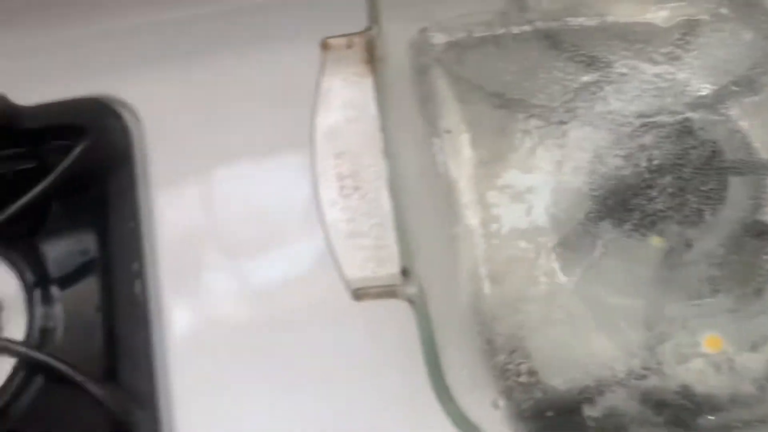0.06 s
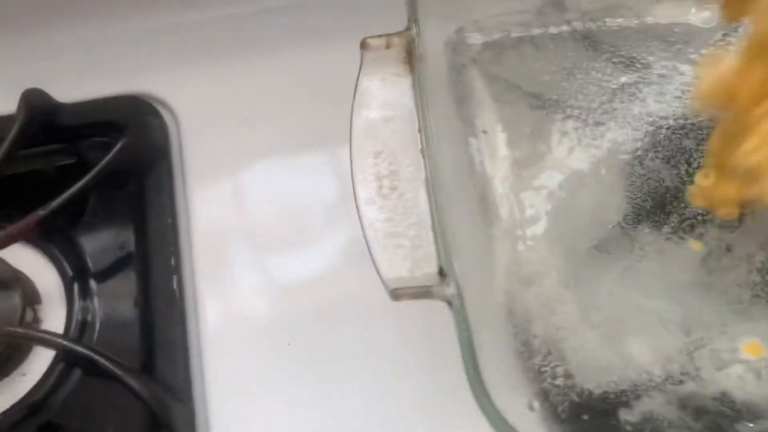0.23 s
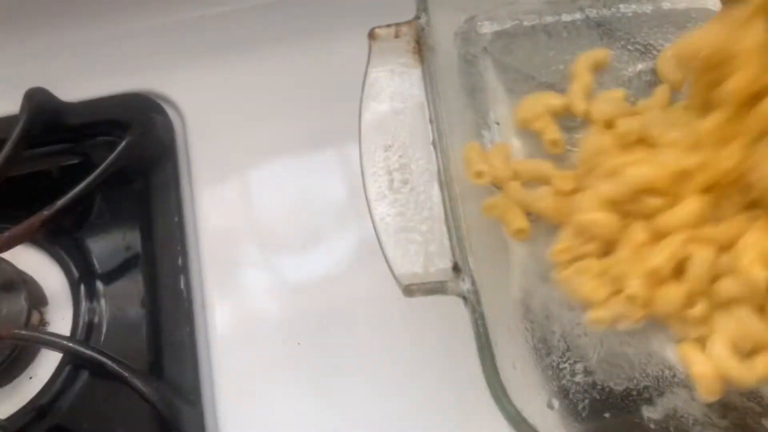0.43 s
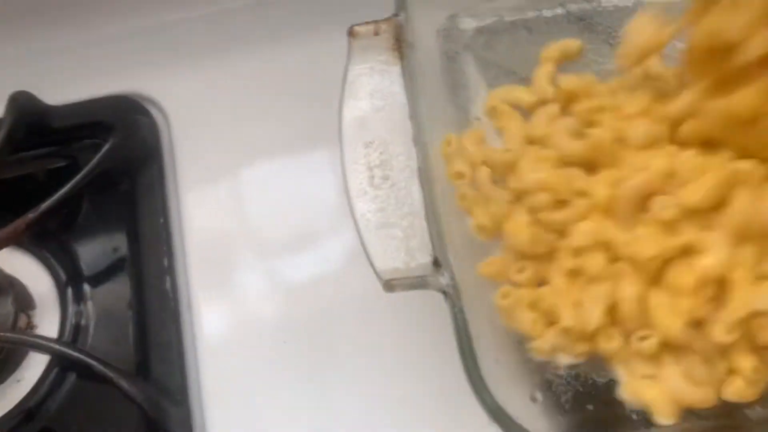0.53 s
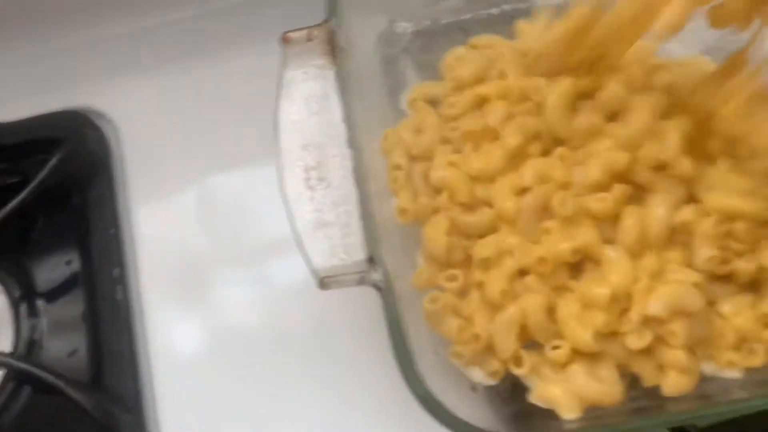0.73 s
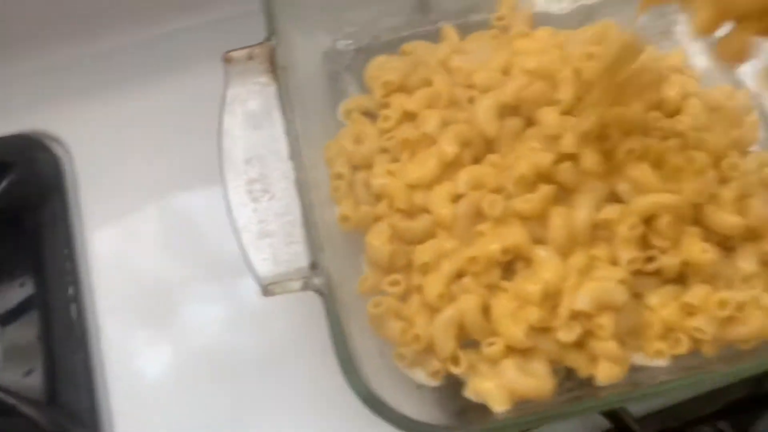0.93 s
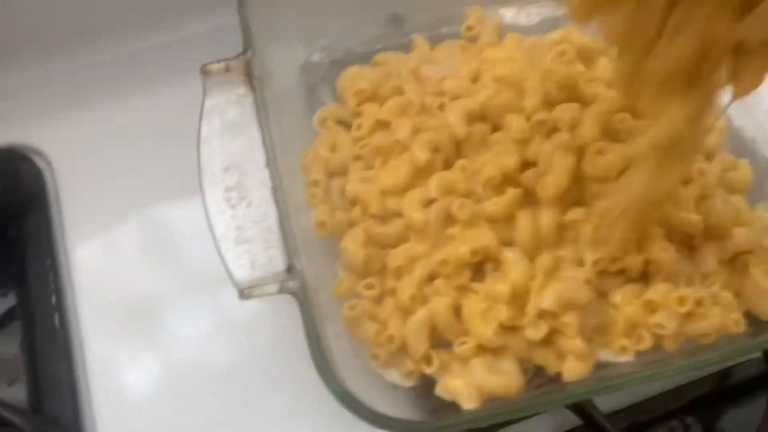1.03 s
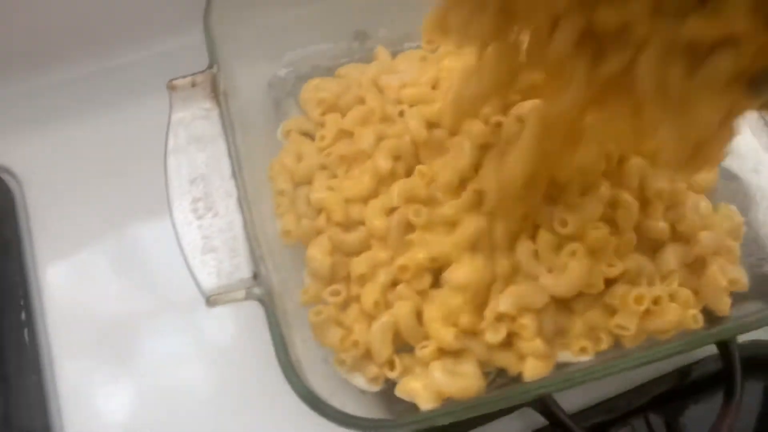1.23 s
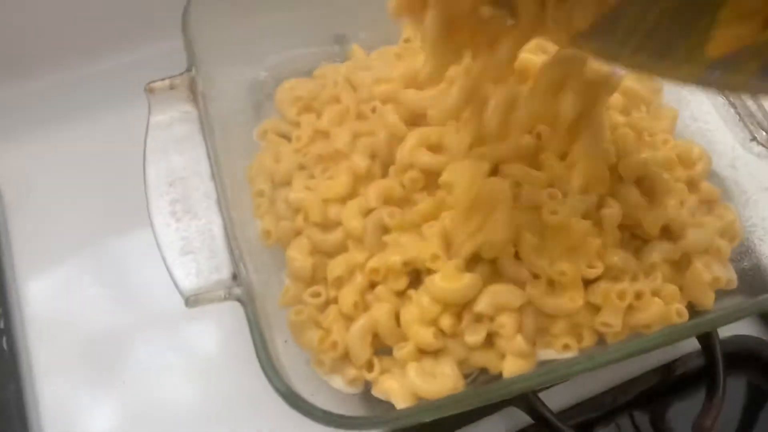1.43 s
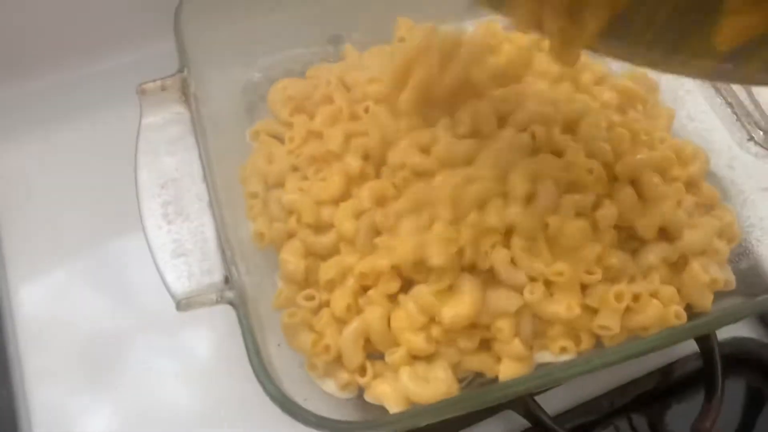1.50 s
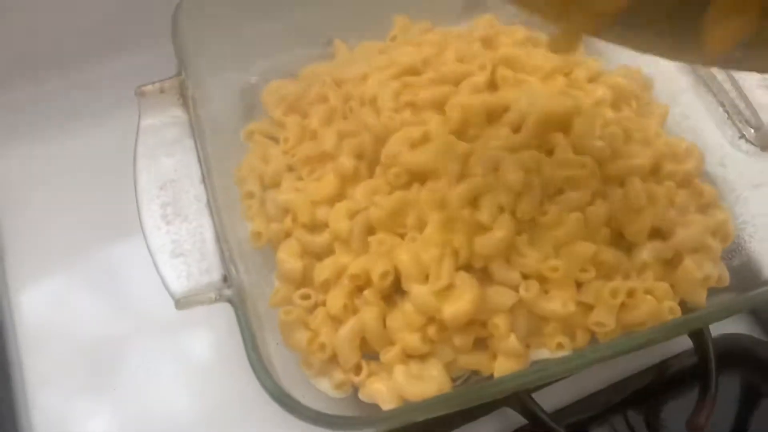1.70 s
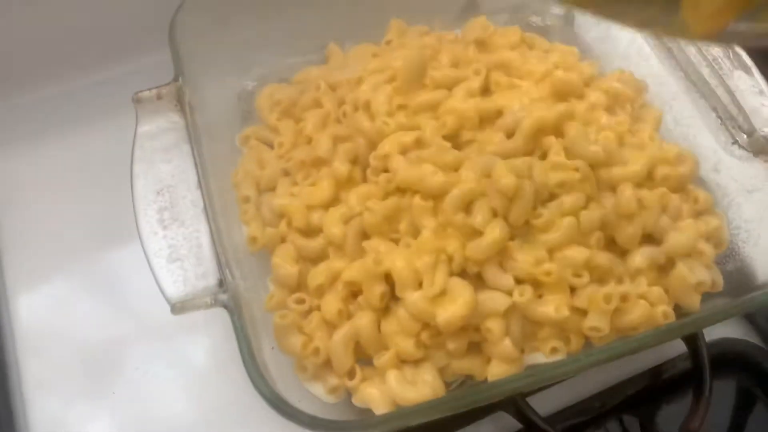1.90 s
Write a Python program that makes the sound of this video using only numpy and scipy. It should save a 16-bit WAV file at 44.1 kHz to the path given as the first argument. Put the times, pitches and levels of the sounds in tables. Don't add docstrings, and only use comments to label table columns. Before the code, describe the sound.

Cooked pasta is dumped into a glass dish. Faint wet ticks and a scrape lead to one loud, dull knock and splat at 0.23 seconds, its hollow ring quickly deadened by about 0.4. Soft lumps thud around 0.6 to 0.8, then sparse sticky clicks cluster near 1.2 and 1.45, with a last tick at 1.92. Close stereo, small kitchen, faint low rumble and hiss.

```python
import sys
import numpy as np
from scipy import signal
from scipy.fft import rfft, irfft, next_fast_len
from scipy.io import wavfile
from scipy.ndimage import map_coordinates

SR = 44100
rng = np.random.default_rng(int(sys.argv[2]) if len(sys.argv) > 2 else 0)


def transcribe(signal):
    frames = np.atleast_2d(signal).T
    limited = np.clip(frames, -1, 1)
    pcm = np.round(limited * 32767).astype(np.int16)
    wavfile.write(sys.argv[1], SR, pcm)


def amplitude_ratio(level_db):
    exponent = np.asarray(level_db, float) / 20
    return 10 ** exponent


N = 85995
KNOCK_S = 0.2335

# frequency in Hz, phase in radians.
PORT_LEAD = [(0, 0), (1050, 2.6), (1500, 1.5), (2000, 2), (2700, 1.2), (4200, 1), (5000, 3.1), (6300, 1.2),
             (7400, 3.14), (14500, 12.8)]


def unit(x):
    return x / np.sqrt(np.mean(x ** 2) + 1e-20)


def along(points, hz):
    f, v = np.transpose(points)
    return np.interp(np.log(hz + 1), np.log(f + 1), v)


def curve(rows):
    return np.interp(np.arange(N) / SR, *np.transpose(rows))


def wobble(rate):
    knots = rng.standard_normal(300)
    position = np.arange(0, N + 64, 64) * rate / SR
    return map_coordinates(knots, position[None]).repeat(64)[:N]


def filtered(x, response):
    m = next_fast_len(N + SR // 2)
    return irfft(rfft(x, m) * response(np.fft.rfftfreq(m, 1 / SR)), m)[..., :N]


def noise(spectrum, size=N):
    colour = filtered(rng.standard_normal(N), lambda hz: amplitude_ratio(along(spectrum, hz)))
    return unit(colour)[:size]


def add(track, s, sound):
    part = track[round(s * SR):][:len(sound)]
    part += sound[:len(part)]


def ping(t, hz, cycles):
    return np.sin(2 * np.pi * hz * t) * amplitude_ratio(-60 * t * hz / (3 * cycles))


def rumble():
    # time in seconds, level in dB.
    rumble_level = [
        (0, -56.5),
        (.12, -63.5),
        (.2, -58.5),
        (.3, -33.5),
        (.6, -50),
        (.9, -55),
        (1.3, -54),
        (1.55, -55.5),
        (1.95, -53.5),
    ]
    # frequency in Hz, level in dB.
    rumble_colour = [(20, -3), (50, 4), (120, -5), (250, -9.5), (500, -15), (750, -26), (1000, -23),
                     (3000, -63)]
    # frequency in Hz, width in Hz, lift in dB.
    hum = [(56.4, 4.9, 3), (99.4, 9.3, 0), (165, 14, 6.5), (251.3, 12, 3.5)]

    def boost(f):
        return 1 + sum(amplitude_ratio(db) / (1 + ((f - hz) / width) ** 2) for hz, width, db in hum)

    def layer():
        return unit(filtered(noise(rumble_colour), boost)) * amplitude_ratio(curve(rumble_level) + 0.89 * wobble(14))

    return np.array([layer(), layer()])


def slide():
    # time in seconds, strength of movement in dB.
    movement = [
        (0.0, -70.5),
        (0.178, -75.5),
        (0.346, -67.5),
        (0.532, -72),
        (0.852, -79),
        (1.118, -78),
        (1.558, -86),
        (1.742, -86.5),
        (1.95, -84),
    ]
    # frequency in Hz, level in dB.
    rush_colour = [(300, -10), (550, -6.5), (750, -15), (1500, -7.5), (3000, -18), (6000, -24), (9000, -22),
                   (14000, -51.5)]
    count, length, centre_hz = 500, 200, 2200
    u, spread, t = rng.random((count, 2)), rng.standard_normal((count, 1)), np.arange(length) / SR
    hz = np.clip(centre_hz * np.exp(spread), 500, 12000)
    strength = amplitude_ratio(9 * u[:, 1:] ** 2) * np.sqrt(hz / centre_hz)
    grains = ping(t, hz, 13) * strength
    at = (u[:, :1] * N).astype(int) + np.arange(length)
    squelch = unit(np.bincount(at.ravel(), grains.ravel(), minlength=N)[:N])
    rush = noise(rush_colour) * amplitude_ratio(3 * wobble(41))
    return amplitude_ratio(curve(movement)) * (amplitude_ratio(-13) * squelch + amplitude_ratio(-4) * rush)


def thuds():
    # start in seconds, peak level in dB, pitch in Hz.
    lumps = [(.046, -47, 56), (.262, -34, 73), (.387, -37, 79), (.454, -42, 100), (.585, -43, 180),
             (.628, -46, 75), (.644, -35, 510), (.646, -42, 850), (.655, -40, 166), (.682, -43, 175),
             (.688, -36, 520), (.711, -40, 420), (.7644, -38, 410), (.765, -44, 820), (.770, -39, 240),
             (.785, -49, 62), (.86, -48, 105), (.918, -43, 56), (1.004, -44, 67), (1.33, -50, 150),
             (1.37, -52, 54), (1.475, -44, 62), (1.56, -43, 68), (1.6, -47, 68), (1.928, -52, 520)]
    out, t = np.zeros(N), np.arange(SR // 5) / SR
    rise = 1 - np.exp(-t / 0.0019)
    for s, db, hz in lumps:
        add(out, s, amplitude_ratio(db + 2.5) * ping(t, hz, 4.09) * rise)
    return out


def ticks():
    # start in seconds, peak level in dB, pitch
    # in Hz, brightness in dB.
    wet_ticks = [(0.112, -56.5, 1284, -7), (0.151, -50.5, 4330, -5.5), (0.16, -50.5, 2040, -19),
                 (.194, -46, 3900, -29), (0.211, -40.5, 3700, -22), (0.217, -29, 3700, -27),
                 (0.228, -35.5, 1550, -14), (.319, -57, 8600, 11), (0.368, -72.5, 8500, 23),
                 (0.632, -58, 4200, -22), (0.69, -79, 3600, 21.5), (0.72, -47.5, 1480, -15),
                 (.784, -48, 3600, -14), (.855, -42.5, 965, -16), (0.902, -41.5, 1403, -33),
                 (0.976, -52.5, 930, -13.5), (1.042, -57.5, 2550, 3.5), (1.062, -45.5, 1420, -27),
                 (1.098, -49, 1390, -14), (1.174, -66, 1600, -27), (1.18, -46.5, 3730, -6.5),
                 (1.205, -59, 1400, 0), (1.217, -56, 1490, -8), (1.221, -50, 3620, -2),
                 (1.2299, -40, 2360, -16), (1.232, -57, 1550, -21), (1.238, -54, 4170, -8),
                 (1.243, -43.5, 3580, -7), (1.377, -54.5, 1380, -21), (1.436, -40, 1530, -18),
                 (1.4353, -55, 3200, -17), (1.4403, -43, 1120, -29), (1.4457, -45, 1540, -25),
                 (1.451, -44, 2190, -27), (1.4614, -49, 2650, 4), (1.463, -57, 1500, -16),
                 (1.734, -70.5, 8300, 13), (1.888, -57.5, 9000, 9), (1.92, -35, 1540, -4),
                 (1.92, -44, 2430, -20), (1.921, -57, 3830, -17), (1.9228, -47, 790, -22),
                 (1.9255, -62, 9500, 1), (.552, -53, 2230, -8), (0.588, -56, 2640, -14),
                 (.05, -63.5, 8900, 8), (.112, -54, 3750, -18), (.122, -76.5, 9500, 16),
              (.208, -60, 6240, -16), (.22, -56, 6500, -6), (.35, -73, 8500, 4), (.456, -68, 8840, 4),
              (.476, -66, 8500, 4), (0.491, -59, 3720, -1), (0.513, -69, 8305, 3), (0.529, -61, 6000, 2),
              (0.592, -75, 8300, 2), (.858, -66, 8550, 11), (1.11, -53.5, 4277, -7), (1.182, -57, 5800, -5),
              (1.224, -63, 8300, 6), (1.357, -72, 8540, 4.5), (1.771, -67, 8400, 8), (1.85, -65, 3970, -2)]
    # frequency in Hz, level in dB.
    snap_colour = [(500, -35), (1000, -13), (1500, 2.5), (4000, -21.5), (7000, -25), (14000, -41.5)]
    # frequency in Hz, level in dB.
    spit_colour = [(3000, -19), (6000, 1), (8500, 6), (11000, -11.5), (14500, -23.5)]
    snap_s, snap_db = 0.006, -22
    spit_s, spit_db = 0.0018, -9
    out, t = np.zeros(N), np.arange(SR // 20) / SR
    snap, spit = noise(snap_colour), noise(spit_colour)
    rise = 1 - np.exp(-t / 0.0007)
    snap_shape, spit_shape = rise * np.exp(-t / snap_s), rise * np.exp(-t / spit_s)
    for s, db, hz, bright_db in wet_ticks:
        start = round(s * SR)
        at = slice(start, start + len(t))
        n = len(snap[at])
        cycles = 6 * np.cbrt(hz / 1500)
        add(out, s, amplitude_ratio(db) * rise * ping(t, hz, cycles))
        add(out, s, amplitude_ratio(db + snap_db) * snap[at] * snap_shape[:n])
        add(out, s, amplitude_ratio(db + bright_db + spit_db) * spit[at] * spit_shape[:n])
    return out


def scrapes():
    # start in seconds, length in seconds, level in dB.
    strokes = [(0.154, 0.0321, -63.5), (0.197, 0.13, -55.5), (0.686, 0.087, -73), (0.848, 0.019, -71),
               (1.023, 0.1, -69.5), (1.173, 0.013, -58), (1.203, 0.085, -62.5), (1.23, 0.019, -56.5),
               (1.429, 0.031, -63.5), (1.456, 0.027, -66.5), (1.915, 0.02, -58.5), (1.929, 0.016, -70)]
    # frequency in Hz, level in dB.
    scrape_colour = [(400, -27), (800, 2), (1200, 2.5), (2500, -7.5), (4300, -9), (5500, -20.5),
                     (9000, -25.5), (14000, -44)]
    t, stroke = np.arange(N) / SR, np.zeros(N)
    for s, length, db in strokes:
        progress = np.clip((t - s) / length, 0, 1)
        stroke += amplitude_ratio(db) * np.sin(np.pi * np.sqrt(progress)) ** 2
    crackle = amplitude_ratio(3 * np.clip(wobble(140), -1, 1))
    return stroke * unit(noise(scrape_colour) * crackle)


def contact():
    # frequency in Hz, level in dB.
    blow_colour = [(60, -35), (200, -4.5), (600, -7), (1000, -8.5), (1500, -30), (4000, -33), (9000, -47),
                   (14000, -65)]
    out = np.zeros(N)
    u = np.arange(SR) / SR / 0.023
    force = 3 * u * np.exp(-3 * u) * np.e
    add(out, KNOCK_S, amplitude_ratio(-28) * noise(blow_colour, size=SR) * force)
    return out


def splat():
    # frequency in Hz, level in dB.
    splat_colour = [(150, -14.5), (500, 8), (1100, -3), (2100, -5.5), (4200, -16.5), (8500, -30.5),
                    (11500, -44.5), (14000, -70)]
    rise_s, hold_s, fall_s = 0.0025, 0.033, 0.014
    out, t = np.zeros(N), np.arange(SR) / SR
    shape = (1 - np.exp(-t / rise_s)) * amplitude_ratio(-np.maximum(t - hold_s, 0) / fall_s * 10)
    level = amplitude_ratio(-30 + 0.83 * wobble(100)[:SR])
    add(out, KNOCK_S, level * noise(splat_colour, size=SR) * shape)
    return out


def ringing():
    # frequency in Hz, level in dB, t60 in seconds, left over right in dB.
    dish = [(524, 3, 0.091, -11), (599, 6, 0.13, 3), (766, 7, 0.058, 1.5), (923.8, -11, 0.39, -8),
            (946, -5.5, 0.28, -5), (1034, 3, 0.097, -2.5), (1162, -5.5, 0.19, 1.5), (1865, -11.5, 0.22, 2),
            (2057, -9, 0.19, 1), (2414, -31.5, 0.14, 1.5), (2670, -30.5, 0.12, 5), (3890, -21.5, .15, -4),
            (4199, -27, 0.21, -1), (983.4, 0.5, 0.12, -7)]
    # frequency in Hz, level in dB, t60 in seconds, left over right in dB, delay in seconds.
    counter = [(97.8, -8.5, 0.66, 8.5, 0.0023), (153.8, -3.5, 1, 4.5, .022), (213, 17, 0.041, -6, 0.0067),
               (241.8, 0, 0.29, -7.5, 0.022), (349.4, -10.5, 0.41, -10.5, 0.0014),
               (483, -4, 0.52, -4, 0.06), (325.6, 2.5, 0.54, -17.5, 0.14), (561, -12.5, 0.7, -18, 0.066),
               (1260, -20, 0.89, 4.5, 0.1), (178, 1, 0.91, 6.5, 0.13), (242, -15, 0.73, -16, 0.11),
               (970, -12.5, 0.97, -4.5, 0.12), (556, -10, .25, 0.5, 0.045), (1215, -20, .15, 3, .09)]
    rise_s, swell_cycles = 0.0013, 0.6
    damp_s, damp_over_s, damp_db = 0.345, 0.025, -10
    unsteady_db, steady_below_hz = 4, 450
    out, t = np.zeros((2, N)), np.arange(SR) / SR
    damping = damp_db * np.clip((t + KNOCK_S - damp_s) / damp_over_s, 0, 1)
    for hz, db, t60, pan_db, late in [*counter, *[(*mode, 0) for mode in dish]]:
        depth_db = unsteady_db * min(hz / steady_below_hz, 1)
        waver = depth_db * np.tanh(wobble(26)[:SR] * t / 0.045)
        swell = 1 - np.exp(-np.maximum(t - late, 0) / (rise_s + swell_cycles / hz))
        level = amplitude_ratio(-23 + db + damping - 60 * t / t60 + waver) * swell
        tone = level * np.sin(2 * np.pi * hz * t)
        add(out[0], KNOCK_S, amplitude_ratio(pan_db / 2) * tone)
        add(out[1], KNOCK_S, amplitude_ratio(-pan_db / 2) * tone)
    return out


def kitchen(x):
    # frequency in Hz, t60 in seconds.
    decay = [(60, 1.4), (200, 1.24), (500, 0.64), (720, 0.17), (1000, 0.38), (3000, 0.2), (8000, 0.16),
             (14000, 0.091)]
    hz, t, z = signal.stft(rng.standard_normal((2, SR)), SR, nperseg=256)
    fading = z * amplitude_ratio(-60 * t / along(decay, hz)[:, None])
    tail = signal.istft(fading, SR, nperseg=256)[1]
    delayed = np.pad(x, (150, 0))
    return signal.fftconvolve(delayed[None], tail / np.linalg.norm(tail[0]), axes=1)[:, :N]


def ports(direct, diffuse):
    # frequency in Hz, correlation from 0 to 1.
    alike = [(50, 0.2), (150, 0.91), (400, 0.53), (1500, 0.13), (5000, 0.65), (12000, 1)]
    # frequency in Hz, right port's gain in dB.
    right_port = [(100, 2), (300, 3), (1000, 5), (5000, -1.5), (7750, 0), (8050, 18), (9500, 5.5),
                  (12000, 4)]

    def share(hz):
        turn = np.arccos(np.clip(along(alike, hz), -1, 1)) / 2
        return np.array([np.cos(turn), np.sin(turn)])

    def colour(hz):
        half = np.exp(0.5j * np.interp(hz, *np.transpose(PORT_LEAD)))
        return np.array([half, amplitude_ratio(along(right_port, hz)) / half])

    mid, side = filtered(diffuse, share)
    return filtered(direct + np.array([mid + side, mid - side]), colour)


def scene():
    low = rumble()
    small = slide() + thuds() + ticks() + scrapes()
    blow, ring = contact() + splat(), ringing()
    knock_sent = amplitude_ratio(-5) * blow + amplitude_ratio(-22) * ring.mean(axis=0)
    room = kitchen(knock_sent) + amplitude_ratio(-10.5) * kitchen(small)
    return ports(blow + ring + small, room + low)


def roll_off(x):
    return signal.sosfilt(signal.butter(12, 14900, fs=SR, output="sos"), x)


def record(dry):
    # frequency in Hz, level in dB.
    hiss_colour = [(100, 5), (3000, -7.5), (8000, -6), (14000, -17.5)]

    def lead(hz):
        half = 0.5j * np.interp(hz, *np.transpose(PORT_LEAD))
        return np.exp(half * np.array([[1], [-1]]))

    shared = amplitude_ratio(7) * filtered(noise(hiss_colour), lead)
    own = np.array([noise(hiss_colour), noise(hiss_colour)])
    mix = filtered(dry + amplitude_ratio(-87.5) * (shared + own), lambda hz: hz < 14480)
    return roll_off(mix)


dry = scene()
out = record(dry)
transcribe(out)
```